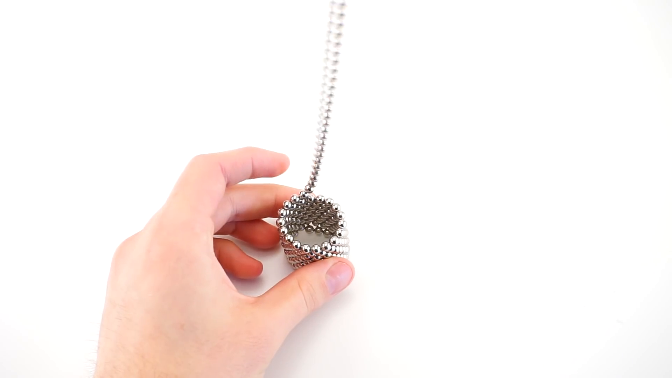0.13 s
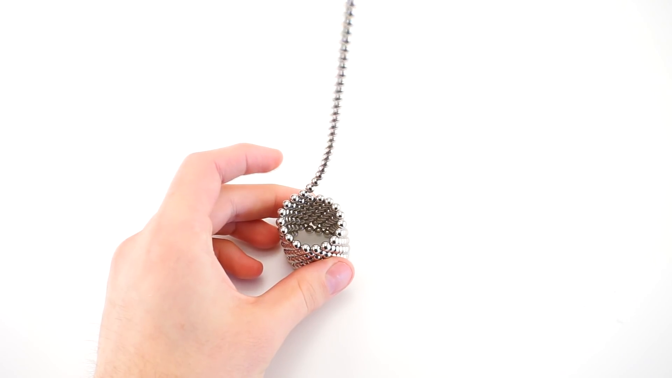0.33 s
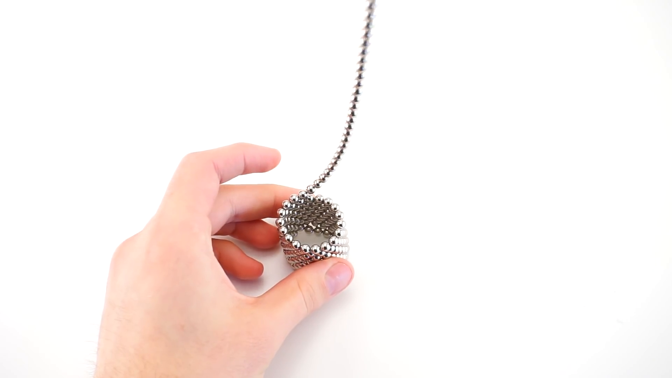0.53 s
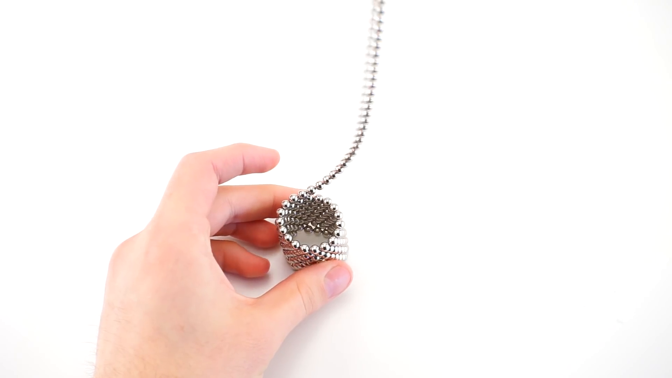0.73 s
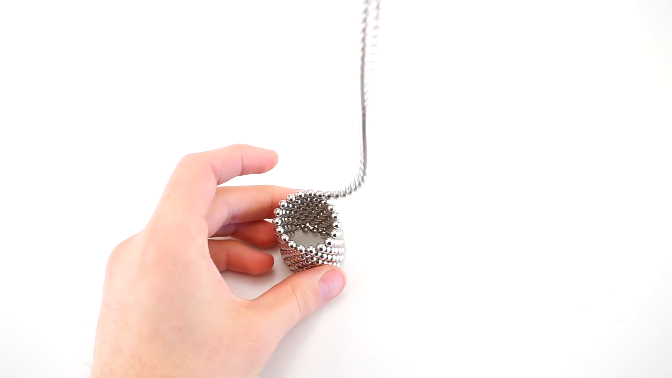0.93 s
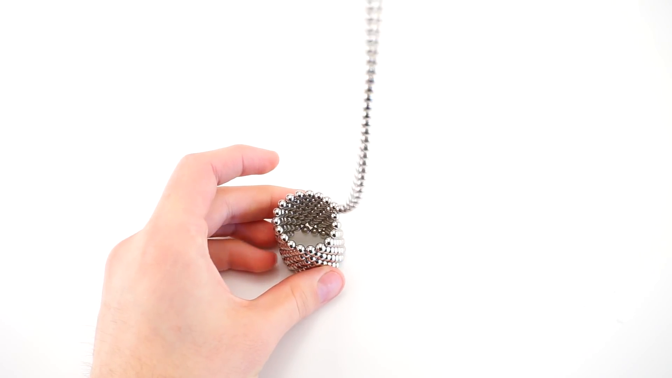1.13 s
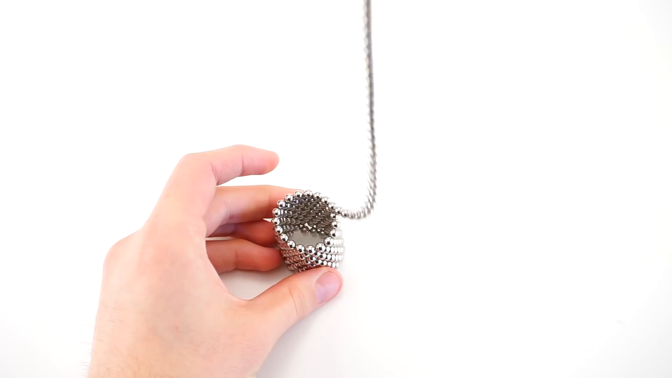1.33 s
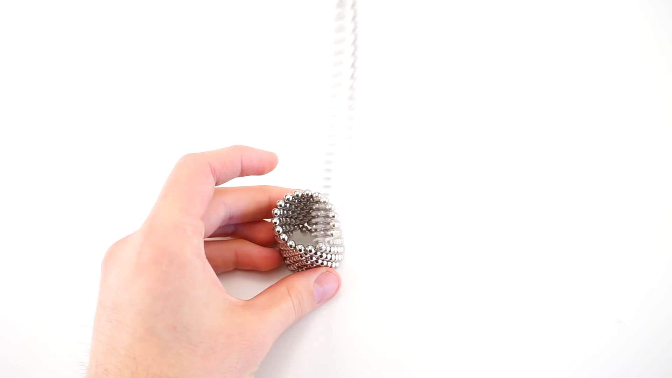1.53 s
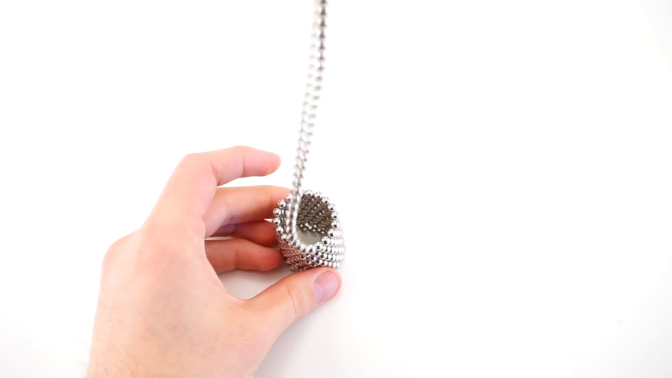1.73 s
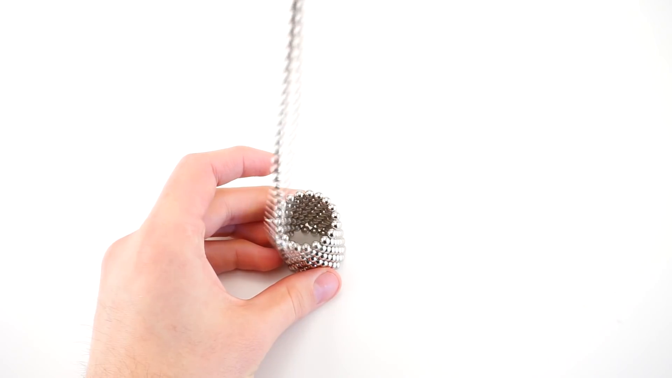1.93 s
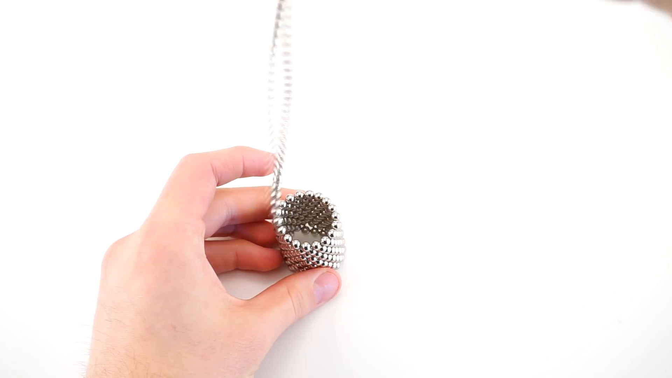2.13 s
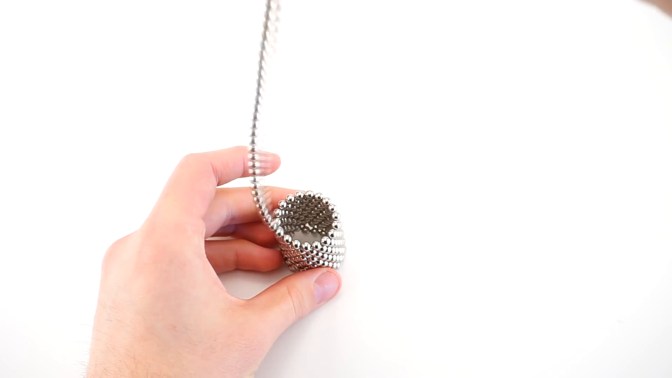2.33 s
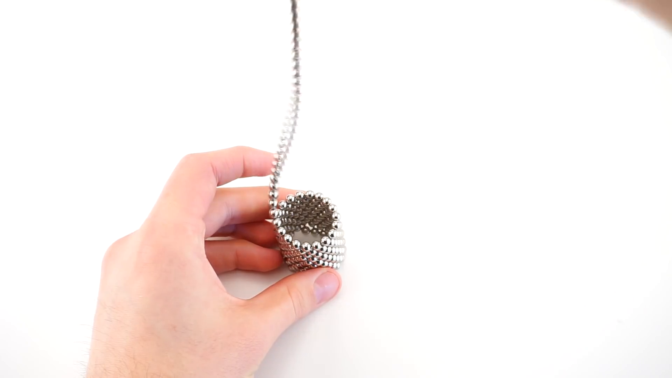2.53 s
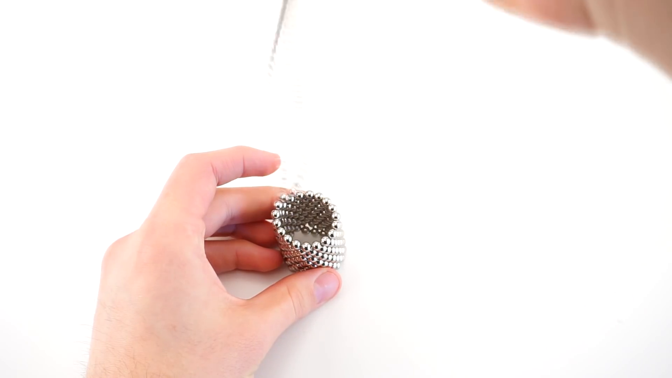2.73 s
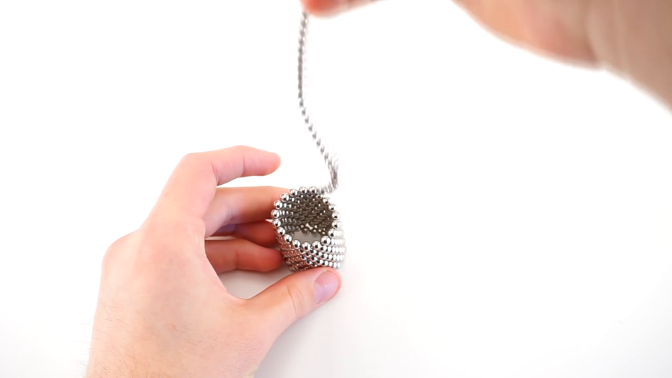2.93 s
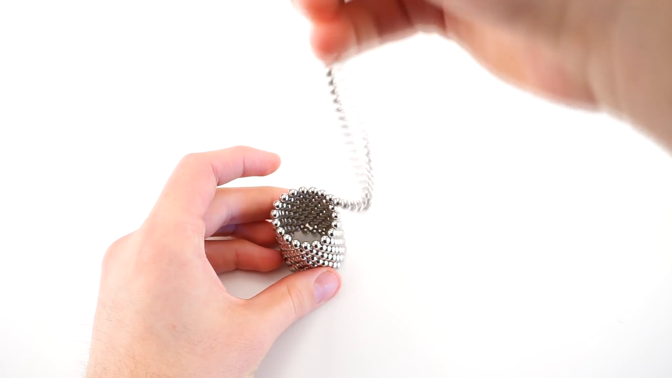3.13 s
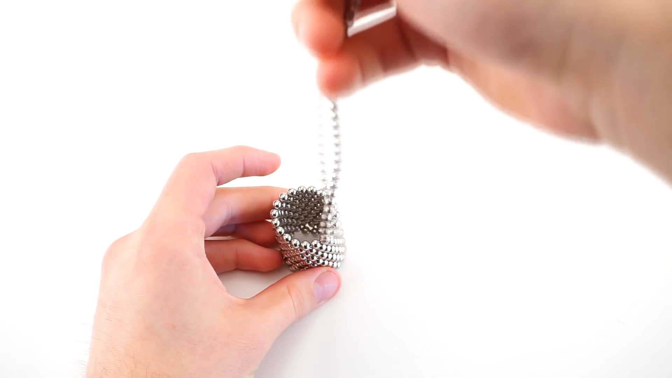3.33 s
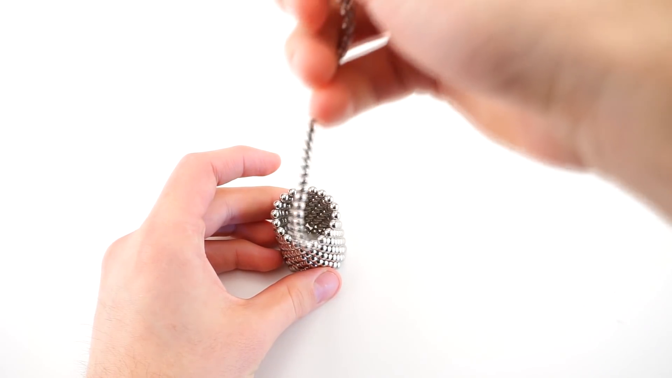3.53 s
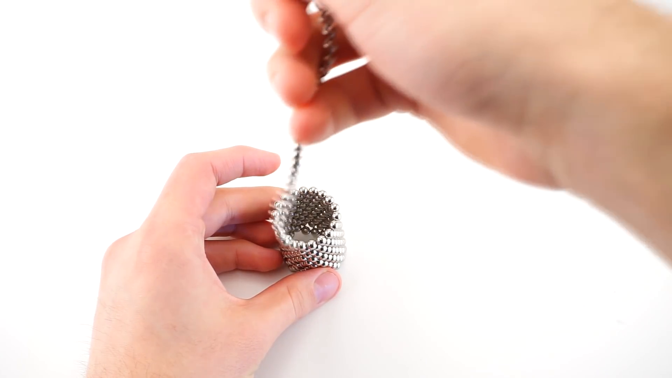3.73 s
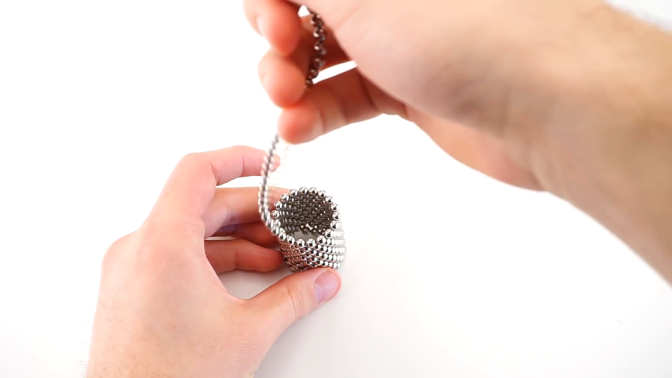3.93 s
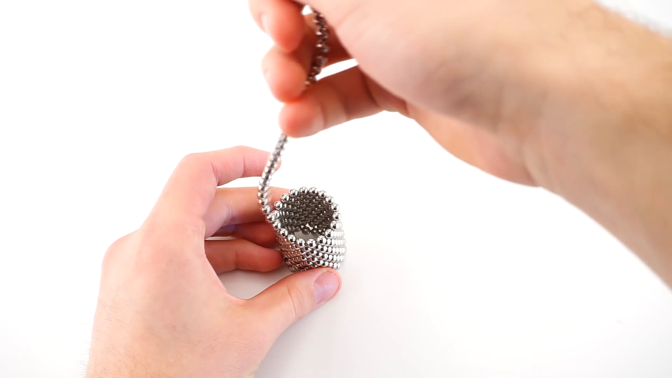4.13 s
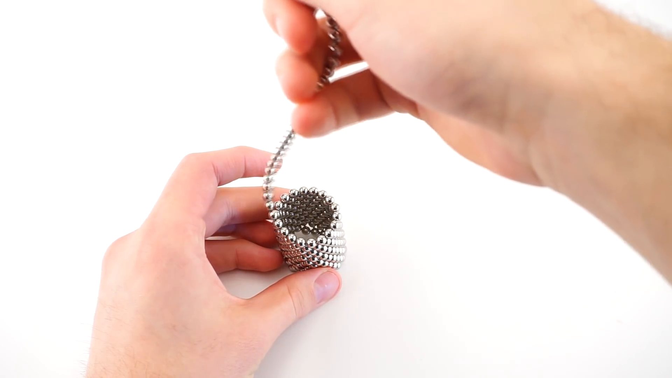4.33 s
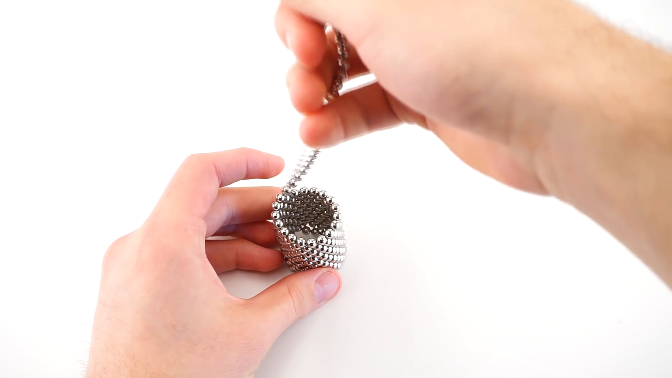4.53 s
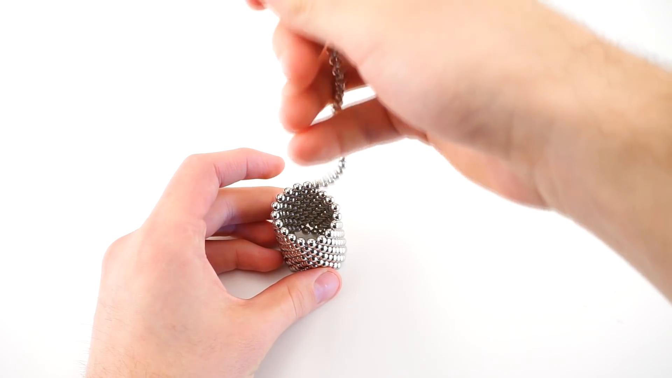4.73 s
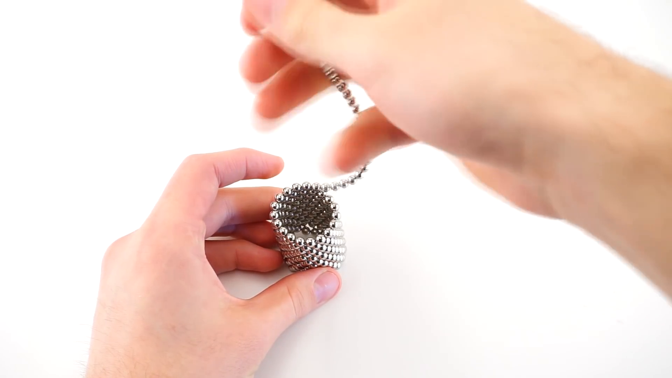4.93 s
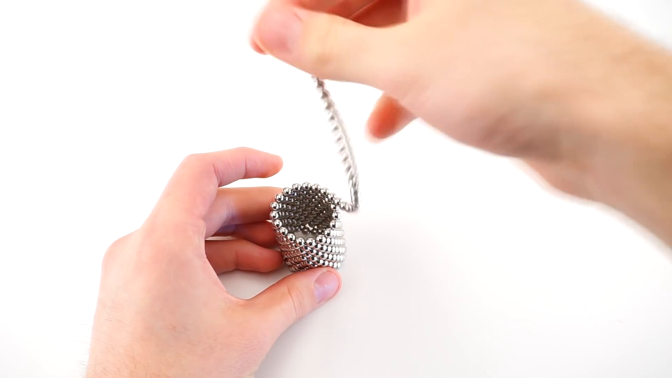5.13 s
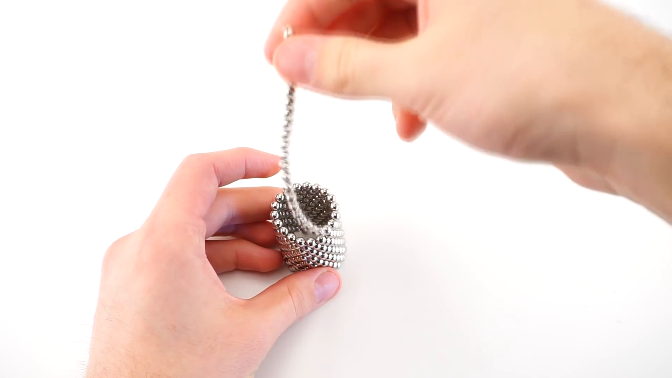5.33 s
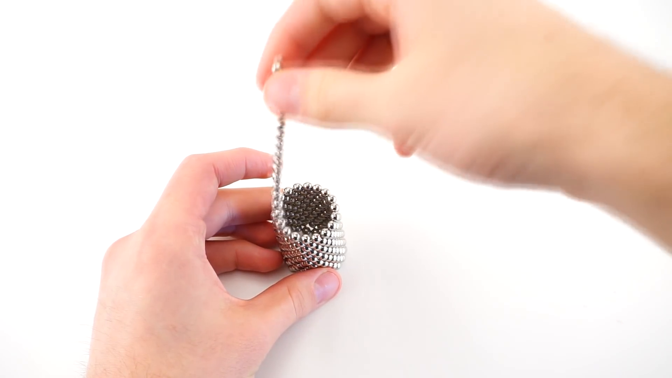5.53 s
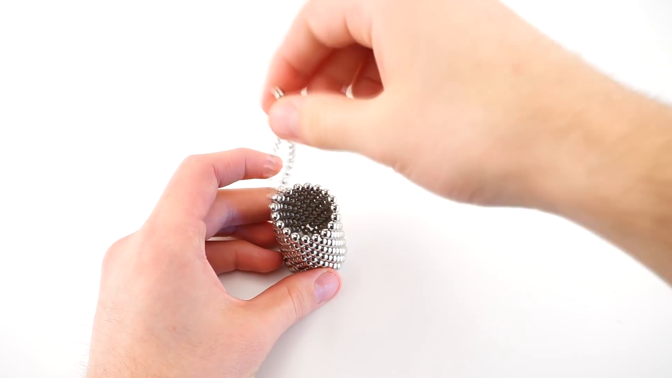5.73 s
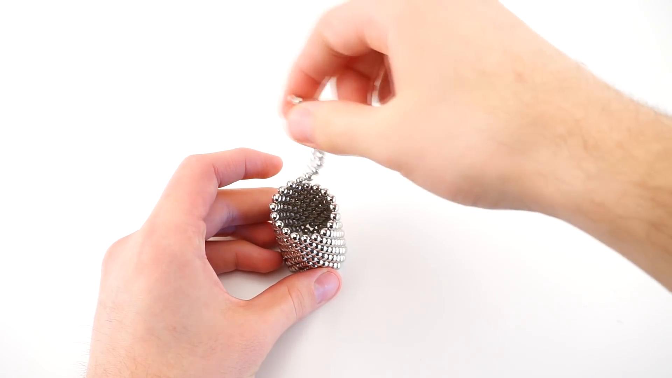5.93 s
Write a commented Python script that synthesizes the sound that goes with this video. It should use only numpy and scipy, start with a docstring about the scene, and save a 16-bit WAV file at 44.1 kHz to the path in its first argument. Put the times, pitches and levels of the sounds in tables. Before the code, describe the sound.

Small magnetic balls snap onto a stack in bright, irregular clicks, each with a brief rattle and a light table thump.

```python
"""Magnetic balls snapping onto a stack

A table in a small quiet room, heard from close by on a two-port stereo microphone. A strand of small
magnetic balls is wound onto a hollow stack that a hand steadies. Ball after ball jumps into place with
a bright tick and a brief rattle, and each snap thumps the table top. The room answers; the fingers
shift softly on the stack over a faint hum and hiss."""
import sys
import numpy as np
from scipy import signal
from scipy.fft import rfft, irfft, next_fast_len
from scipy.io import wavfile
from scipy.ndimage import uniform_filter1d

SR = 44100
rng = np.random.default_rng(int(sys.argv[2]) if len(sys.argv) > 2 else 0)


def wrap_up_sound(samples):
    """Save the sound to the file named by the first command line argument, as 16-bit audio."""
    columns = np.atleast_2d(samples).T
    # keep every value between -1 and 1, then stretch to whole-number steps
    tamed = np.clip(columns, -1, 1)
    steps = np.round(tamed * 32767).astype(np.int16)
    wavfile.write(sys.argv[1], SR, steps)


N = 263718


def from_db(db):
    return 10 ** (np.asarray(db) / 20)


def unit_energy(x):
    return x / np.sqrt(np.mean(np.sum(x ** 2, axis=-1)) + 1e-20)


def at_hz(points, hz, column=1):
    """Reads a column of a table on a log-frequency axis."""
    points = np.array(points)
    return np.interp(np.log(np.maximum(hz, 1)), np.log(points[:, 0]), points[:, column])


def dying(t, t60):
    """An envelope that starts at t = 0 and loses 60 dB in t60 seconds."""
    return (t >= 0) * np.exp(-np.log(1000) * np.maximum(t, 0) / t60)


def causal(gain_db):
    """The minimum-phase response with these gains: nothing sounds before its cause."""
    cepstrum = irfft(gain_db * np.log(10) / 20)
    half = len(cepstrum) // 2
    cepstrum[1:half] *= 2
    cepstrum[half + 1:] = 0
    return np.exp(rfft(cepstrum))


def add(out, sound, start_s):
    start = int(round(start_s * SR))
    out[..., start:start + sound.shape[-1]] += sound[..., :N - start]


# How alike the background is at the two ports: frequency_hz, correlation (0-1)
PORT_LIKENESS = [(50, 1), (250, 0.72), (700, 0), (2000, 0), (12000, 0)]
def steady_noise(spectrum):
    """Stereo noise of rms 1, alike in both channels in the bass."""
    hz = np.fft.rfftfreq(N, 1 / SR)
    mid, side = rfft(rng.standard_normal((2, N))) * from_db(at_hz(spectrum, hz)) * (hz > 15)
    alike = np.clip(at_hz(PORT_LIKENESS, hz), 0, 1)
    stereo = np.sqrt(1 + alike) * mid + np.sqrt(1 - alike) * side * [[1], [-1]]
    return np.sqrt(N) * unit_energy(irfft(stereo, N))


# The still room all around the microphone: frequency_hz, relative_density_db
AIR_SPECTRUM = [(12, -32), (20, -4), (53, -16.5), (77, -20.5), (187, -7), (301, -18), (558, -18),
                (923, -21), (1290, -24), (2820, -27.5), (3160, -31), (4060, -31), (16000, -37)]
def room_tone(hiss_db=-57.5, hum_db=-67.5, hum_hz=50):
    """A steady hiss with a faint, pure hum under it."""
    hum = np.sqrt(2) * np.sin(2 * np.pi * hum_hz * np.arange(N) / SR)
    return from_db(hiss_db) * steady_noise(AIR_SPECTRUM) + from_db(hum_db) * hum


def grip_db(time_s, loose_db=-4.5, firms_at_s=1.45, firming_s=0.67):
    """The hand holds the stack loosely at first, then firmly (0 dB)."""
    return loose_db * (1 - np.clip((time_s - firms_at_s) / firming_s, 0, 1))


# Hands on the table, near the microphone: frequency_hz, relative_density_db
HAND_SPECTRUM = [(25, -18), (55, 4.5), (85, 4.5), (105, 1.5), (130, -3.5), (165, -4), (300, -9.5),
                 (700, -16), (2000, -22.5)]
def hand_rumble(firm_level_db=-55):
    """The hands rumble on the table, louder once the grip firms."""
    return from_db(firm_level_db + grip_db(np.arange(N) / SR)) * steady_noise(HAND_SPECTRUM)


# The small room's walls, heard from the table: frequency_hz, gain_db, t60_s
WALL_DECAY = [(280, -13, 0.13), (595, 3, 0.66), (1380, -1.5, 0.36), (3370, -5.5, 0.49), (6050, -13.5, 0.46),
              (14200, -12.5, 0.28)]
def wall_tail(x, delay_s=0.006, apart_hz=700):
    """Reflections from the walls: noise that dies band by band, different at each port."""
    t, response = np.arange(SR * 3 // 5) / SR, 0
    edges_hz = np.geomspace(150, 18000, 11)
    for low, high in zip(edges_hz, edges_hz[1:]):
        hz = np.sqrt(low * high)
        decay = dying(t - delay_s, at_hz(WALL_DECAY, hz, column=2))
        tail = unit_energy(rng.standard_normal((2, len(t))) * decay)
        band = signal.butter(2, [low, high], "band", fs=SR, output="sos")
        response = response + from_db(at_hz(WALL_DECAY, hz)) * signal.sosfilt(band, tail)
    # long waves reach both ports alike
    side = signal.sosfilt(signal.butter(1, apart_hz, "high", fs=SR, output="sos"), response[1])
    stereo = (response[0] + side * [[1], [-1]]) / np.sqrt(2)
    return signal.fftconvolve(x, stereo, axes=1)[:, :N]


def drifting_tail(x, drift_hz=1.7):
    """The room's tail drifts between two noise patterns: smooth, its grain changing from snap to snap."""
    angle = 2 * np.pi * drift_hz * np.arange(N) / SR
    return wall_tail(x * np.cos(angle)) + wall_tail(x * np.sin(angle))


# The microphone's left port against its right: frequency_hz, phase_lead_rad, level_db
MIC_PORTS = [(200, 0.04, -0.1), (1000, 0.28, -2.5), (3100, 0.052, -1.5), (5460, 1.78, 1), (9000, 1.37, 0),
             (12700, 0.5, 1.7), (16000, 0.79, 2)]
def at_microphone(x):
    """The direct sound reaches the two ports slightly out of step and unequal in level."""
    size = next_fast_len(N + SR // 10)
    hz, half = np.fft.rfftfreq(size, 1 / SR), np.array([[.5], [-.5]])
    phase = np.exp(1j * half * at_hz(MIC_PORTS, hz))
    gain = from_db(half * at_hz(MIC_PORTS, hz, column=2))
    return irfft(rfft(x, size) * phase * gain, size)[:, :N]


# Modes of the table top under the stack: pitch_hz, gain_db, t60_s
TABLE_MODES = [(91.3, -12, 0.6), (131.7, -15.5, 0.99), (210.4, -9.5, 0.57), (228.2, -10.5, 0.35),
               (254.7, -11.5, 0.46), (298.5, -0.5, 0.094), (335.1, -1, 0.15), (355.4, -13, 0.3),
               (404, -26.5, 0.81), (446.6, -19, 0.15), (485.5, -26.5, 0.32), (532, -21.5, 0.28),
               (599, -31, 0.61), (622, -18, 0.15), (707, -20, 0.051), (751.7, -28, 0.3), (872, -30, 0.23),
               (1040, -13, 0.033), (1243, -41, 0.17)]
def table_top(blows, gain_db, spread_db, lowpass_hz, detune=0.0238, radiate_hz=195):
    """Blows (start_s, level_db) ring the table; the grip shifts its modes a little each time."""
    t, out = np.arange(SR // 3) / SR, np.zeros(N)
    pitch_hz, mode_db, t60 = np.transpose(TABLE_MODES)[:, :, None]
    decay = dying(t, t60)
    for start_s, level_db in blows:
        level_jitter, pitch_jitter = rng.standard_normal((2, len(TABLE_MODES), 1))
        modes = np.sin(2 * np.pi * pitch_hz * (1 + detune * pitch_jitter) * t) * decay
        thump = np.sum(from_db(mode_db + spread_db * level_jitter) * modes, axis=0)
        add(out, -from_db(level_db + gain_db) * thump, start_s)
    # a panel radiates little in the deep bass
    return signal.sosfilt(signal.butter(2, [radiate_hz, lowpass_hz], "band", fs=SR, output="sos"), out)


# Fingers shifting on the stack, close by: start_s, relative_level_db
FINGER_NUDGES = [(.625, -50), (.70, -54), (1.21, -45.5), (2.41, -76), (3.568, -43)]
def finger_nudges():
    """Soft pushes pass through the stack into the table as dull bumps."""
    return table_top(FINGER_NUDGES, gain_db=-1, spread_db=4, lowpass_hz=380)


def evened(force, width_hz=1200):
    """Spectrum of a burst of hard contacts: no broad peaks or dips, unit energy."""
    spectrum = rfft(force)
    bins = int(width_hz * force.shape[-1] / SR)
    power = uniform_filter1d(np.mean(np.abs(spectrum) ** 2, axis=0), bins)
    return spectrum * causal(-10 * np.log10(power + 1e-12))


def touches(t, t60, stereo_spread=0.79):
    """Spectrum of a dying burst of tiny touches. Squared noise gives a few hard among many light."""
    noise = rng.standard_normal(len(t)) + stereo_spread * rng.standard_normal((2, len(t)))
    return evened(noise * np.abs(noise) * dying(t, t60))


# The neighbouring balls' duller rattle against the crack: frequency_hz, relative_level_db
RATTLE_COLOUR = [(600, 7), (2000, 20), (4000, -0.5), (8000, -1), (13000, -5.5)]
def snap_force(t, hz, rattle_spread_db=2, approach_db=-19, scatter_db=-10):
    """Spectrum of a snap: grazing touches as the ball closes in, a hard crack, then neighbours rattle."""
    crack = evened(np.tanh(rng.standard_normal((1, len(t)))) * dying(t, t60=0.0022), width_hz=4300)
    rattle_gain = from_db(rattle_spread_db * rng.standard_normal()) * causal(at_hz(RATTLE_COLOUR, hz))
    rattle = rattle_gain * touches(t - 0.0007, t60=0.036)
    # crack and rattle share the energy of the blow
    blow = (crack + rattle) * causal(-10 * np.log10(1 + np.abs(rattle_gain) ** 2))
    approach = from_db(approach_db) * touches(-t, t60=0.011)
    # a brief scattered echo, different for every snap
    scatter = from_db(scatter_db) * touches(t - 0.0042, t60=0.01, stereo_spread=0.69)
    return blow + approach + scatter


# Resonances of the hollow stack: pitch_hz, width_hz, gain_db
STACK_MODES = [(1728, 76, 8), (2100, 180, 2.5), (3430, 98, 6), (4540, 680, 4), (5610, 140, 5),
               (6167, 160, 8.5), (8720, 620, 4.5), (12240, 1360, 1.5), (14100, 770, 8.5),
               (15900, 600, 11.5)]
def stack_ring(hz, detune=0.01):
    """The stack's response: every seat on the rim rings at slightly different pitches."""
    shifts = 1 + detune * rng.standard_normal(len(STACK_MODES))
    return 1 + sum((from_db(gain_db) - 1) / (1 + 2j * (hz - pitch_hz * shift) / width_hz)
                   for (pitch_hz, width_hz, gain_db), shift in zip(STACK_MODES, shifts))


# Where the strand meets the rim, counted from the far side: time_s, angle_turns
WINDING_PATH = [(0.8, 0.04), (1.5, 0.27), (2.1, 0.72), (2.6, 0.87), (3.0, 1.2), (4.0, 1.57), (4.45, 2.04),
                (5.2, 2.32), (5.55, 2.72), (5.98, 2.8)]
def rim_openness(time_s, open_side_turns=0.22):
    """The strand circles the rim: -1 at the fingers, +1 on the open side opposite them."""
    angle_turns = np.interp(time_s, *np.transpose(WINDING_PATH))
    return np.cos(2 * np.pi * (angle_turns - open_side_turns))


# Knock, snap, clack and tick of a typical blow:
# frequency_hz, relative_level_db, db_per_strength_db, db_per_grip_db, open_side_db
SNAP_BANDS = [(1490, -39.5, 0.88, 0, 4.5), (3100, -33.5, 0.7, 0.5, -3), (5400, -27.5, 0.82, 1.0, 0.04),
              (12700, -23.5, 1, 0.5, 0)]
# Colour of one ball striking another: frequency_hz, gain_db
CONTACT_COLOUR = [(130, 0), (300, 1), (600, 9), (900, 1), (1150, 8), (1450, -1.5), (2100, 3.5),
                  (2850, -1.5), (3700, 0), (5100, -2.5), (6600, 0.5), (7800, -4.5), (9900, -1),
                  (12000, 0.5), (15000, -5.5)]
def snap_colour_db(start_s, strength_db, hz, typical_strength_db=-22):
    """A snap is brighter when hard, crisper under a firm grip, hollower on the rim's open side."""
    band_hz, typical_db, per_strength, per_grip, open_db = np.transpose(SNAP_BANDS)
    band_db = typical_db + per_strength * (strength_db - typical_strength_db)
    band_db += per_grip * grip_db(start_s) + open_db * rim_openness(start_s)
    return at_hz(np.transpose([band_hz, band_db]), hz) + at_hz(CONTACT_COLOUR, hz)


# Balls landing on the stack, close to the microphone: start_s, strength_db, relative_thump_db
BALL_SNAPS = [(0.9106, -26, -48), (0.9281, -26, -42), (1.0568, -40, -59), (1.065, -24, -45),
              (1.148, -24, -42), (1.4319, -41, -54.5), (1.443, -24, -42), (1.5141, -22.5, -43.5),
              (1.584, -23, -42.5), (1.6749, -22.5, -44.5), (1.9659, -24.5, -41), (1.9814, -25.5, -39.5),
              (2.1164, -22, -36), (2.143, -21.5, -32), (2.5198, -27, -36.5), (2.5996, -29.5, -36),
              (2.7058, -23.5, -31), (2.7225, -26, -33), (2.7789, -22, -37), (2.809, -28.5, -38.5),
              (2.8988, -22, -36.5), (2.927, -32.5, -45.5), (3.0202, -20, -39.5), (3.0813, -25, -40.5),
              (3.231, -20, -36), (3.25, -22, -36), (3.3755, -24.5, -40), (3.4335, -31.5, -43),
              (3.5867, -24.5, -39.5), (3.7576, -21, -35.5), (3.7665, -24, -40.5), (3.9185, -41.5, -47),
              (4.0254, -22.5, -34.5), (4.062, -22.5, -34), (4.414, -24, -37.5), (4.4242, -28, -37.5),
              (4.4672, -21.5, -34.5), (4.5339, -21, -34.5), (4.6306, -20, -35.5), (4.7222, -20.5, -32.5),
              (4.7504, -21.5, -35.5), (4.8043, -27, -43.5), (5.0104, -24, -42), (5.0469, -31, -48.5),
              (5.2407, -23.5, -38.5), (5.25, -28, -37), (5.3289, -23, -38.5), (5.5408, -24, -38.5),
              (5.5458, -21.5, -38.5), (5.575, -26, -37.5), (5.5974, -23, -38), (5.63, -24, -43),
              (5.6541, -23.5, -35), (5.7566, -18.5, -41), (5.7715, -21, -37), (5.7765, -25, -38),
              (5.8066, -26.5, -36), (5.8574, -42, -63), (5.925, -23.5, -37), (5.9736, -20, -37.5)]
def snap_thumps():
    """Each snap passes down through the stack and thumps the table."""
    blows = [(start_s, thump_db) for start_s, _, thump_db in BALL_SNAPS]
    return table_top(blows, gain_db=1.5, spread_db=4.5, lowpass_hz=3100)


def ball_snaps(gain_db=24.5, lead_s=0.004, size=4096):
    """Each ball jumps into its seat, and the force of the contact rings the stack."""
    t, hz = np.arange(size) / SR - lead_s, np.fft.rfftfreq(size, 1 / SR)
    out = np.zeros((2, N))
    for start_s, strength_db, _ in BALL_SNAPS:
        colour = causal(snap_colour_db(start_s, strength_db, hz))
        add(out, irfft(snap_force(t, hz) * stack_ring(hz) * colour), start_s - lead_s)
    return from_db(gain_db) * out


def scene():
    """Table and snaps at the microphone, the walls behind them, over rumble, hum and hiss."""
    direct = snap_thumps() + finger_nudges() + ball_snaps()
    return at_microphone(direct) + drifting_tail(direct) + hand_rumble() + room_tone()


def record(dry, cutoff_hz=15800):
    """The highest treble is cut steeply."""
    return signal.sosfilt(signal.ellip(8, .3, 70, cutoff_hz, fs=SR, output="sos"), dry)


dry = scene()
out = record(dry)
wrap_up_sound(out)
```